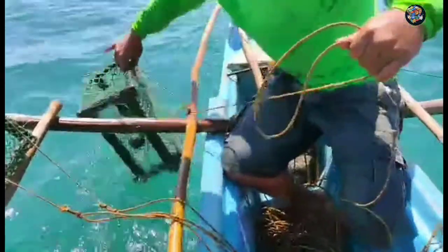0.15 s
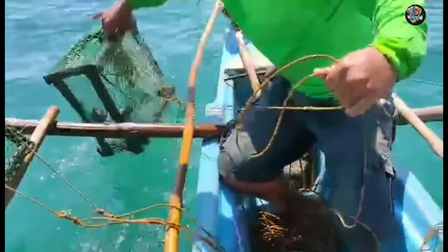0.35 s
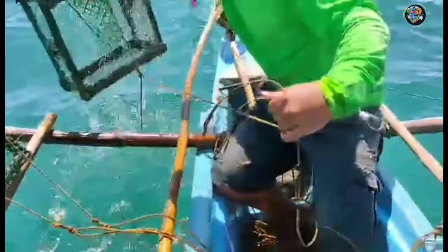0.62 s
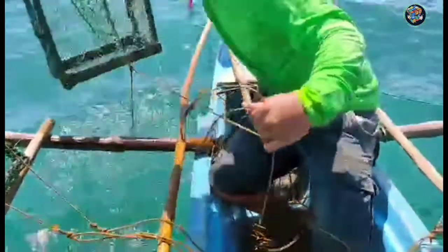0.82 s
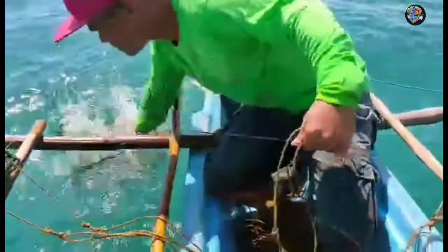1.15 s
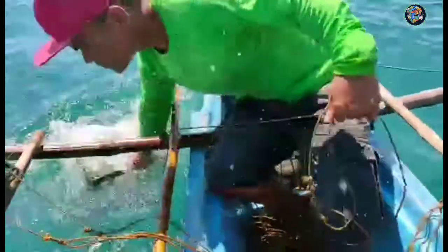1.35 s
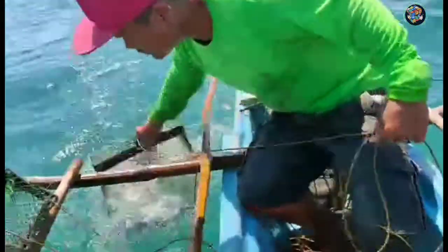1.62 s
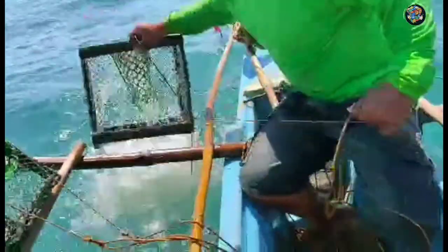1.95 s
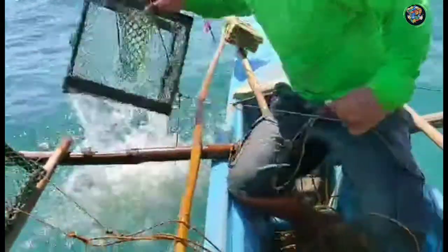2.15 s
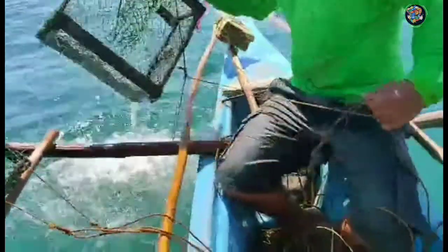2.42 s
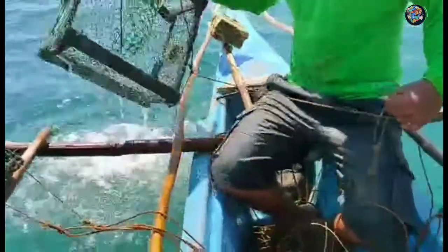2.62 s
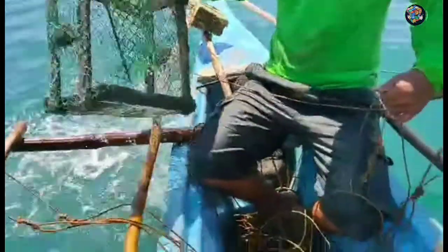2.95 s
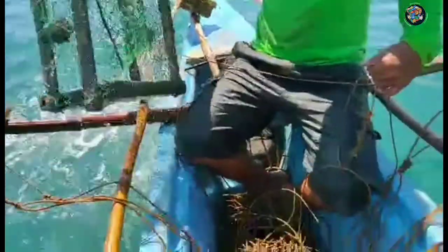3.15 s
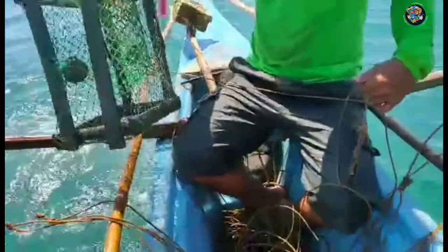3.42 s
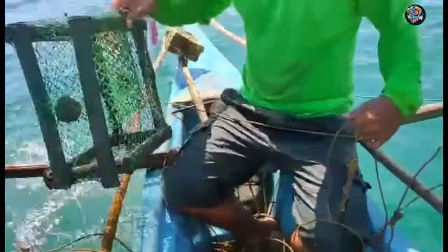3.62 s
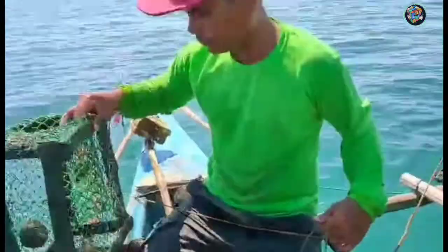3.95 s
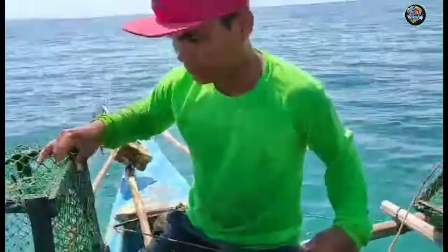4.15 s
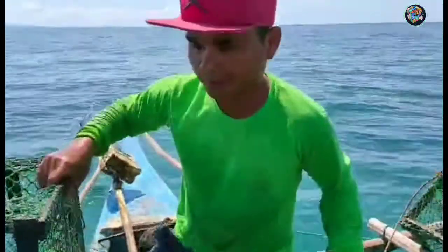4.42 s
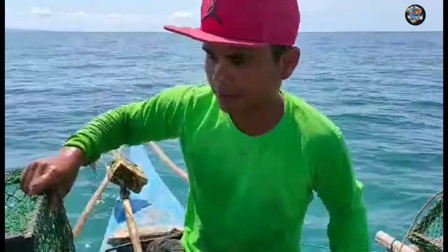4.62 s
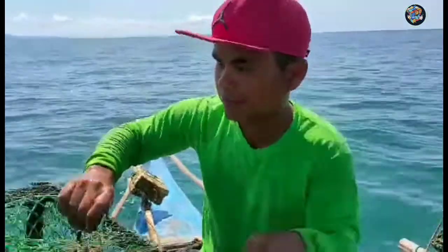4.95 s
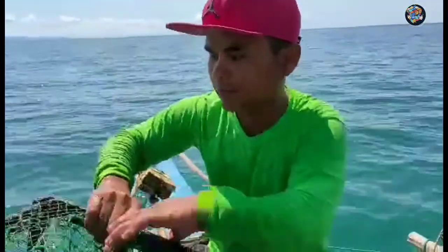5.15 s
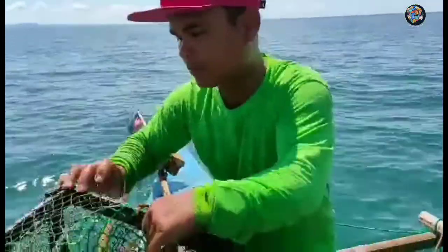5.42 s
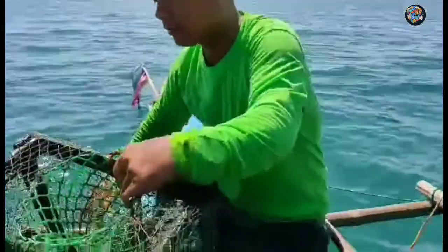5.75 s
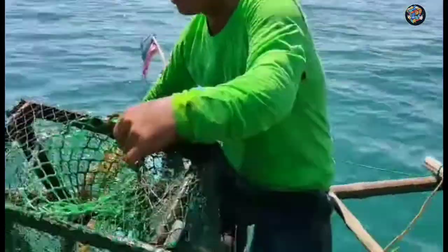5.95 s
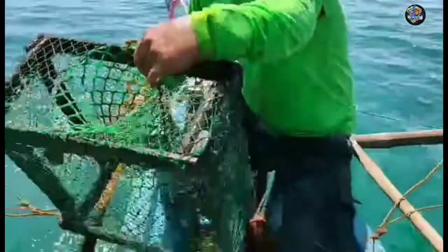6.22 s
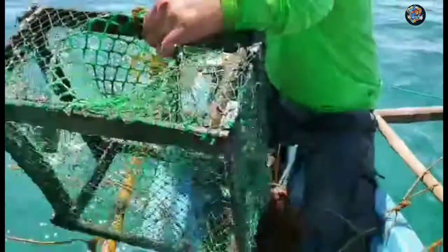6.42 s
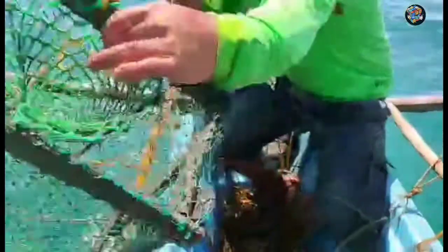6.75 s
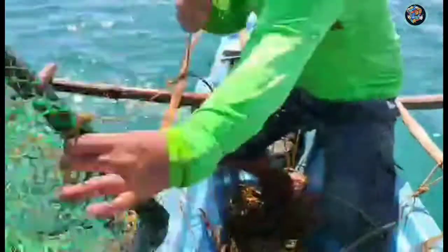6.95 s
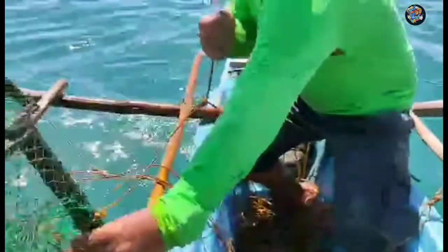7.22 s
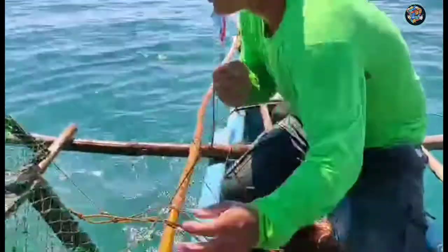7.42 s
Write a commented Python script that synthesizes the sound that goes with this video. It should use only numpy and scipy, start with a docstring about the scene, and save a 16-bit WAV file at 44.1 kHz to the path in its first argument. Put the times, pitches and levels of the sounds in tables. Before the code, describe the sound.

Faint bubbles and drips, then a heavy splash as a mesh trap plunges into the sea, draining water, scattered hollow wooden knocks.

```python
"""Faint bubbles ping and drops tick at first; then a wet net trap is dunked in the sea beside a small
wooden boat, drained, dragged over the edge and set down on the hull. Bubbles are gliding sines, the water
is shaped noise and grains, drops are noise snaps, and knocks ring the modes of the hollow hull.
Two microphone ports a few centimetres apart hear the water from the right, the hull a little to the left."""
import sys
import numpy as np
from scipy import signal
from scipy.fft import rfft, irfft, next_fast_len
from scipy.io import wavfile
from scipy.ndimage import uniform_filter1d, map_coordinates

SR = 44100
rng = np.random.default_rng(int(sys.argv[2]) if len(sys.argv) > 2 else 0)


def wav_record(signal):
    """Record a signal, one row per channel, as 16-bit PCM in the file named by sys.argv[1]."""
    frames = np.transpose(np.atleast_2d(signal))
    bounded = np.clip(frames, -1, 1)
    # unit amplitude maps onto the largest positive 16-bit level
    quanta = np.round(bounded * 32767).astype(np.int16)
    wavfile.write(sys.argv[1], SR, quanta)


N = 335160


def amp(db):
    """Decibels to gain."""
    return 10 ** (np.asarray(db) / 20)


def unit(x):
    """Scaled to rms 1."""
    return x / np.sqrt(np.mean(x ** 2) + 1e-20)


def along(points, hz):
    """(f/Hz, value) points read on a log frequency axis, held flat beyond the ends."""
    f, v = np.transpose(points)
    return np.interp(np.log(hz + 1), np.log(f + 1), v)


def wobble(rate):
    """A smooth random curve, rate knots a second."""
    knots = rng.standard_normal(int(N * rate / SR) + 4)
    return map_coordinates(knots, [np.arange(N) * rate / SR])


def filtered(x, response):
    """x times a complex response of frequency."""
    m = next_fast_len(x.shape[-1] + 8192)
    return irfft(rfft(x, m) * response(np.fft.rfftfreq(m, 1 / SR)), m)[..., :x.shape[-1]]


def coloured_noise(spectrum):
    """Steady noise with a given spectrum, rms 1."""
    return unit(filtered(rng.standard_normal(N), lambda hz: amp(along(spectrum, hz))))


def add(track, s, sound):
    """Mix a sound in at time s."""
    part = track[..., round(s * SR):][..., :sound.shape[-1]]
    part += sound[..., :part.shape[-1]]


def grains(count, hz, spread, cycles, rise, size_db):
    """Damped sines at random moments, rising in pitch if rise is above 0, rms 1 together."""
    u, z = rng.random((count, 2)), rng.standard_normal(count)
    pitch = (hz * np.exp(spread * np.clip(z, -2, 2)))[:, None]
    turns = pitch * np.arange(int(4e6 // count)) / SR
    shape = np.exp(-turns / cycles) * (1 - np.exp(-turns))
    size = amp(-size_db * np.log(np.maximum(u[:, 1:], .01)))
    waves = size * shape * np.sin(2 * np.pi * turns * (1 + rise * turns / cycles))
    index = (u[:, :1] * N).astype(int) + np.arange(turns.shape[1])
    return unit(np.bincount(index.ravel(), waves.ravel(), N)[:N])


def textured(grain, share, spectrum, patchy_db):
    """Grains over noise, evened out, given patches of random gain and then a spectrum."""
    mix = share * grain + (1 - share) * rng.standard_normal(N)
    z = signal.stft(mix, nperseg=512)[2]
    z = z / uniform_filter1d(np.sqrt(np.mean(abs(z) ** 2, axis=1, keepdims=True)), size=5, axis=0)
    patches = uniform_filter1d(rng.standard_normal(z.shape), size=5, axis=0)
    patches = uniform_filter1d(patches, size=6, axis=1)
    flat = signal.istft(z * amp(patchy_db * unit(patches)), nperseg=512)[1][:N]
    return unit(filtered(flat, lambda hz: amp(along(spectrum, hz))))


# the sea low under the hull: (f/Hz, level/dB per Hz)
SEA_SPECTRUM = [(20, -3.5), (110, 7.5), (180, -4.5), (300, -9), (450, -38.5), (880, -120)]


def swell():
    """The sea murmurs low under the hull: deep noise whose level wavers."""
    return amp(-77.5 + 1.8 * wobble(14.0)) * coloured_noise(SEA_SPECTRUM)


# water draining from the trap and lapping at the hull: (t/s, gurgle level/dB, spray level/dB)
DRAINING = [(0, -73.5, -78.5), (.25, -79, -69), (.56, -73, -69.5), (0.731, -69.5, -82), (.77, -46, -50.5),
            (1, -47.5, -51.5), (1.37, -55, -60.5), (1.74, -52.5, -62), (2.3, -60.5, -58),
            (2.68, -61, -60.5), (3.14, -68.5, -65.5), (3.759, -72.5, -71), (3.9, -75.5, -71.5),
            (4.15, -67, -65.5), (4.47, -66, -74.5), (4.8, -86, -82), (5.6, -74.5, -77.5),
            (6.2, -91.5, -77.5), (7.3, -106, -80.5), (7.6, -79, -104)]
# sloshes of water: (t/s at full strength, gurgle level/dB, hold/s)
SLOSHES_OF_WATER = [(0.16, -61.5, 0.018), (0.348, -61.5, 0.05), (0.647, -60, 0.037), (0.891, -34, 0.016),
                    (4.53, -66.5, 0.023), (4.867, -66.5, 0.2), (5.022, -64, 0.32), (5.856, -64.5, 0.025),
                    (6.281, -71.5, 0.34), (6.905, -64.5, 0.23), (7.38, -73.5, 0.079)]
SLOSH_RISE_DB_PER_S, SLOSH_SINK_DB_PER_S = 257, 142.5
SLOSH_SPRAY_DB = -5  # spray over the gurgle


def flow():
    """Gurgle and spray level in dB: the draining plus every slosh, added as power."""
    t = np.arange(N) / SR
    s, *levels_db = np.transpose(DRAINING)
    sloshes = np.zeros(N)
    for at, db, hold in SLOSHES_OF_WATER:
        before, after = np.maximum(at - t, 0), np.maximum(t - at - hold, 0)
        level_db = db - SLOSH_RISE_DB_PER_S * before - SLOSH_SINK_DB_PER_S * after
        sloshes += amp(2 * level_db)  # doubled dB: power
    draining = amp([2 * np.interp(t, s, db) for db in levels_db])
    return 10 * np.log10(draining + sloshes * amp([[0], [2 * SLOSH_SPRAY_DB]]))


def spatter(count, depth_db):
    """Gain that jumps whenever a drop lands and sinks back within some milliseconds."""
    u = rng.random((count, 2))
    drops = np.bincount((u[:, 0] * N).astype(int), -np.log(u[:, 1]), N)
    sinking = signal.lfilter([1], [1, -np.exp(-1 / (0.0066 * SR))], drops)
    return amp(depth_db * np.minimum(sinking, 2))


# body of the water, small bubbles: (f/Hz, level/dB per Hz)
GURGLE_SPECTRUM = [(350, -41.5), (640, -6.5), (786, -6.5), (1520, -5), (3130, -10.5), (3800, -31.5),
                   (4940, -54), (8360, -120)]
# big bubbles in a strong flow: (f/Hz, level/dB per Hz)
CHURN_SPECTRUM = [(150, -49), (250, -15), (450, 1), (650, -1.5), (1000, -66.5)]
# fine spray: (f/Hz, level/dB per Hz)
SPRAY_SPECTRUM = [(2240, -17), (3800, -7), (4960, -5), (6620, -1), (8340, -1), (12600, -15.5), (13300, -38)]


def wash():
    """Water draining and churning: many small bubbles below, fine spray above."""
    flow_db, spray_db = flow()
    slosh, drops = wobble(12.0), spatter(count=260, depth_db=6.0)
    drops = drops ** np.clip((-52.5 - flow_db) / 12, 0, 1)  # a strong flow drowns single drops

    small = grains(count=6000, hz=1510.6, spread=0.5564, cycles=10.9, rise=0.027, size_db=2.5)
    gurgle_gain = amp(flow_db + 3.5 * slosh) * drops
    gurgle = gurgle_gain * textured(small, 0.27, GURGLE_SPECTRUM, patchy_db=3.5)

    # only a strong flow traps big bubbles, so their level climbs faster than the flow
    big = grains(count=4000, hz=455.0, spread=.3, cycles=2.8, rise=0.054, size_db=2.0)
    churn_gain = amp(-64 + 1.43 * (flow_db + 55.0) + 0.24 * wobble(2.0))
    churn = churn_gain * textured(big, 0.3, CHURN_SPECTRUM, patchy_db=3.5)

    fine = grains(count=6000, hz=6310, spread=0.56, cycles=8.2, rise=0.018, size_db=10.5)
    spray_gain = amp(spray_db + 0.37 * slosh) * drops
    spray = spray_gain * textured(fine, 0.22, SPRAY_SPECTRUM, patchy_db=4.0)
    return gurgle + churn + spray


# single drops snapping on wood and mesh: (t/s, level/dB)
DROP_TICKS = [(0.0516, -53.5), (0.4178, -43.5), (0.4532, -42.5), (0.5505, -46.5), (2.3504, -50),
              (2.6903, -35), (3.243, -46), (3.3424, -45.5), (3.6086, -46.5), (3.653, -48), (3.707, -47),
              (3.9354, -46.5), (4.272, -42), (4.5066, -45), (6.2596, -49.5)]


def ticks(count):
    """Each drop is a bright snap of a few milliseconds; lesser ones fall at random, following the spray."""
    t, track = np.arange(SR // 20) / SR, np.zeros(N)
    drain_s, _, spray_db = np.transpose(DRAINING)
    lesser = []
    for s, size in rng.random((count, 2)) * [N / SR, 1]:
        lesser.append((s, np.interp(s, drain_s, spray_db) + 11 + 8 * size))
    for s, db in [*DROP_TICKS, *lesser]:
        add(track, s, amp(db - 6 - 60 * t / 0.016))
    bright, body = coloured_noise(SPRAY_SPECTRUM), coloured_noise(GURGLE_SPECTRUM)
    return track * (bright + amp(-6.5) * body)


PLINK_HZ, PLINK_SPREAD, PLINK_CYCLES, PLINK_RISE = 1506, .45, 9, 0.24  # middle values
PLINK_DB, PLINK_SCATTER_DB = 5.5, 7  # over the draining gurgle
PLINK_TOP_DB = -58.5  # a gurgle stronger than this drowns them


def plinks(count):
    """Rows of lesser bubbles at random moments, their level following the draining water up to a cap."""
    s = rng.random(count) * N / SR + 0.002017
    z = np.clip(rng.standard_normal((count, 4)), -2, 2)
    hz = PLINK_HZ * np.exp(PLINK_SPREAD * z[:, 0])
    drain_s, gurgle_db, _ = np.transpose(DRAINING)
    around_db = np.minimum(np.interp(s, drain_s, gurgle_db), PLINK_TOP_DB)
    db = around_db + PLINK_DB + PLINK_SCATTER_DB * z[:, 1]
    length = PLINK_CYCLES * np.exp(0.87 * z[:, 2]) / hz
    return np.transpose([s, db, hz, length, PLINK_RISE * (1 + 0.51 * z[:, 3])])


# the clearest single bubbles, and the low boom of the plunge at .887 s:
# (t/s, level/dB, first f/Hz, length/s, share by which the pitch climbs over that length)
BUBBLES_AND_BOOM = [(.125, -54.5, 1447, 0.095, -0.11), (.209, -45.5, 846, 0.026, 0.12),
                    (.254, -49.5, 1143, 0.042, 0.19), (.327, -60.5, 471, 0.09, 0.13),
                    (.347, -48.5, 870, 0.034, -0.016), (.455, -48.5, 510, 0.019, -0.016),
                    (.509, -43, 453, 0.057, -0.048), (.553, -44, 452, 0.03, 0.044),
                    (.591, -43.5, 471, 0.021, 0.072), (.636, -46, 565, 0.031, 0.081),
                    (.668, -49.5, 698, 0.019, 1), (.721, -47, 780, 0.02, 0.42),
                    (.767, -26, 496, 0.0078, -0.1), (.887, -39, 90.6, 0.089, .16),
                    (.892, -30, 500, 0.024, 0.0053), (.98, -22, 490, 0.0049, 0.015),
                    (1.699, -34, 445, 0.0044, -0.064), (1.716, -42, 667, 0.037, -0.41),
                    (1.859, -43, 494, 0.015, -0.002), (2.046, -38, 266, 0.021, 0.012),
                    (2.558, -48.5, 354, 0.031, -0.0066), (2.903, -42, 1180, 0.0063, -0.0049),
                    (3.077, -49.5, 562, 0.036, -0.033), (3.094, -38.5, 2765, 0.017, -0.012),
                    (3.133, -37, 516, 0.026, 0.11), (3.298, -50.5, 2440, 0.028, 0.21),
                    (3.448, -53.5, 1156, 0.016, 0.15), (3.503, -56.5, 1314, 0.021, 0.18),
                    (3.528, -57.5, 466, 0.024, 0.43), (3.697, -43, 1625, 0.0076, 0.058),
                    (3.77, -50.5, 1630, 0.013, 0.24), (4.119, -44, 1060, 0.017, 0.12),
                    (4.279, -53.5, 722, 0.046, 0.12), (4.401, -46, 1364, 0.016, 0.0052),
                    (4.642, -50.5, 1680, 0.018, 0.02), (5.663, -47.5, 692, 0.037, 0.065),
                    (7.161, -49.5, 1404, 0.029, 0.074), (7.224, -53, 844, 0.01, -0.18)]


def bubbles():
    """Bubbles, and the plunge's low boom, are fading sines that glide in pitch; moving water makes them tremble."""
    out, waver, tremble = np.zeros(N), wobble(160.0), wobble(120.0)
    for s, db, first_hz, length, rise in [*BUBBLES_AND_BOOM, *plinks(count=600)]:
        t = np.arange(int(3 * length * SR)) / SR
        here = np.minimum(round(s * SR) + np.arange(len(t)), N - 1)
        glide = rise * np.minimum(t / length, 1.3)  # a bubble's pitch glides as it nears the surface
        pitch = first_hz * (1 + glide + 0.038 * waver[here])
        fade = amp(-11 * (t / length) ** 1.35)
        fade *= 1 - np.exp(-t * first_hz / 1.11)  # builds over about a cycle
        ring = np.sin(2 * np.pi * np.cumsum(pitch) / SR)
        add(out, s - .002, amp(db + 2.0 * tremble[here]) * fade * ring)
    return out


# thrown water landing: (t/s, spray level/dB, body level/dB over the spray)
LANDINGS = [(0.3253, -45, -2.5), (0.588, -53.5, 2), (0.616, -48, -4.5), (0.7484, -14.5, -1),
            (0.8644, -33.5, -2.5), (1.489, -50, 14), (2.22, -61.5, 15), (2.264, -45.5, 0.5),
            (2.617, -44, -19.5), (3.095, -50, -13), (3.444, -48, -33), (3.599, -54, -15), (3.898, -54.5, 3),
            (4.399, -54, 4.5), (4.5122, -45, -14), (5.6685, -60.5, 13), (6.0714, -67, 11.5),
            (6.789, -35, 9.5), (7.343, -75, 3), (7.398, -68.5, 8.5)]


def splats():
    """Thrown water lands as a burst of noise that builds over some milliseconds and dies."""
    t = np.arange(SR // 2) / SR
    tracks = np.zeros((2, N))
    for s, db, body_db in LANDINGS:
        life = 0.084 * amp(0.014 * (db + 50.5))  # more water takes longer to land
        build_s = 0.0018 * amp(.5 * (db + 56.5))
        burst = amp(db - 60 * t / life) * (1 - np.exp(-t / build_s))
        add(tracks, s - .003, burst * amp([[body_db], [0]]))
    body, spray = coloured_noise(GURGLE_SPECTRUM), coloured_noise(SPRAY_SPECTRUM)
    return tracks[0] * body + tracks[1] * spray


# the wet mesh dragged over the edge of the hull: (f/Hz, level/dB per Hz)
RASP_SPECTRUM = [(88, -45), (150, -16.5), (776, -6.5), (2660, -13), (4010, -21), (8000, -21), (13000, -36)]
DRAG_S, DRAG_END_S = 6.695, 6.8  # full strength from, to
DRAG_DB, DRAG_SLOPE_DB_PER_S = -44.5, 459  # level; build-up and fall


def drag():
    """Mesh knots slip over the wood in a dense, even rasp until the frame lands."""
    t = np.arange(N) / SR
    knots = grains(count=20000, hz=3050, spread=.6, cycles=1.23, rise=0, size_db=-1.0)
    outside_s = np.maximum(DRAG_S - t, 0) + np.maximum(t - DRAG_END_S, 0)
    stroke = amp(DRAG_DB - DRAG_SLOPE_DB_PER_S * outside_s)
    return stroke * textured(knots, 0.19, RASP_SPECTRUM, patchy_db=1.0)


# thuds through the hull, from the trap frame or its plunge alongside:
# (t/s, thud level/dB, strongest tone f/Hz, crack level/dB over the thud)
HULL_KNOCKS = [(.759, -41.5, 440, 8.5), (.884, -29, 380, -1.5), (2.596, -25, 204, -3),
               (2.615, -27.5, 180, -7), (2.692, -37.5, 202, -28), (2.761, -33.5, 169.4, -24),
               (2.995, -48, 330, -9), (3.014, -42.5, 205, -16.5), (3.889, -53.5, 370, -14),
               (3.907, -45.5, 180, 3), (3.943, -48, 200, 8), (4.262, -49.5, 181, -17),
               (4.291, -48.5, 205, -10), (5.023, -29, 298, -1), (5.052, -32, 243, -8.5),
               (5.11, -27.5, 265, -2.5), (5.152, -44, 198, 6.5), (5.211, -27.5, 249, -1.5),
               (5.293, -34.5, 233, -1.5), (5.334, -44.5, 170, -8.5), (5.385, -50, 215, -11),
               (5.834, -39.5, 286, 9), (6.017, -61.5, 286, -15.5), (6.693, -44.5, 330, 10.5),
               (6.795, -15, 360, 2), (6.833, -32, 250, 10.5), (6.846, -24.5, 123, -19),
               (6.917, -35.5, 197, -24), (6.955, -35, 138, -24), (7.009, -46, 424, 9),
               (7.13, -49, 135.5, -12), (7.17, -57, 90.8, -22)]
# ringing modes of the hull: (f/Hz, level/dB, t60/s)
HULL_MODES = [(98, -9, 1), (133.6, -6, 0.62), (178, -4.5, 0.56), (205, -8, 0.75), (247.4, 0.5, 0.24),
              (293.6, -3, 0.23), (354.6, 2, 0.22), (473, -24.5, 0.056), (678.5, -8.5, 0.12),
              (836, -5, 0.058), (1063, -8, 0.059), (1213, -4, 0.026)]


def knocks():
    """Every blow rings the low hull modes nearest its strongest tone most, with a rumble and a woody crack."""
    out, t, flutter = np.zeros(N), np.arange(SR // 2) / SR, wobble(22.0)
    for s, db, tone_hz, crack_db in HULL_KNOCKS:
        thud, crack = np.zeros(len(t)), np.zeros(len(t))
        for hz, level, t60 in HULL_MODES:
            # each mode is a close pair, so the ring beats instead of singing
            pair = sum(np.sin(2 * np.pi * hz * (1 + 0.018 * rng.normal()) * t) for _ in range(2))
            ring = amp(level + rng.normal(0, 2.55) - 60 * t / t60) * pair
            if hz < 500:
                nearness = amp(-13 * abs(np.log2(hz / tone_hz)))
                thud += ring * nearness * (1 - np.exp(-t * hz / 0.86))  # deep modes build slowly
            else:
                crack += ring
        wood = lambda f: 1j * f * 900 / (850 ** 2 - f * f + 1j * f * 900)
        crack += 0.89 * amp(-60 * t / 0.22) * filtered(rng.standard_normal(len(t)), wood)

        # the many weaker hull modes merge into a rough rumble
        resonance = lambda f: 1j * f * tone_hz / (tone_hz ** 2 - f * f + 1j * f * tone_hz)
        boom = lambda f: resonance(f) / (1 + 1j * f / 450) ** 2
        rumble = unit(filtered(rng.standard_normal(len(t)), boom))
        thud += 0.64 * amp(-60 * t / 0.45) * (1 - np.exp(-t / 0.0084)) * rumble
        thud *= 1 + 2.1 * np.exp(-t / 0.025)  # the struck plank gives up its energy first
        thud *= amp(-20 * (t / 0.43) ** 4)  # the ring holds at first, then drops away ever faster

        crack *= amp(crack_db) / abs(crack).max()
        blow = thud / abs(thud).max() + (1 - np.exp(-t / 0.0018)) * crack
        blow = filtered(blow, lambda f: (1j * f / (1j * f + 60.0)) ** 2)  # a small hull radiates little deep bass
        add(out, s - .002, amp(db) * blow)
    return out * amp(1.6 * flutter)  # a quick random flutter makes the ring uneven


# left-right likeness at the two ports: (f/Hz, likeness 0 to 1)
LIKENESS = [(30, 0.84), (120, 0.93), (600, 0.91), (2000, 0.48), (8000, 0.26)]


def ports(x, lag_ms, alike_scale):
    """Two ports: the left hears later by the lag (earlier if negative), and scattered sound differs between them."""
    z = signal.stft(x, nperseg=128)[2]
    scrambled = z * np.exp(2j * np.pi * rng.random(z.shape))
    other = signal.istft(scrambled, nperseg=128)[1][:len(x)]
    other = other * np.std(x) / (np.std(other) + 1e-20)
    turn = lambda hz: np.arccos(np.clip(alike_scale * along(LIKENESS, hz), 0, 1)) / 2
    late = lambda hz: np.exp(-1j * np.pi * hz * lag_ms / 1000)  # half the lag on each side
    mid, side = filtered(np.array([x, other]), lambda hz: np.array([np.cos(turn(hz)), np.sin(turn(hz))]))
    return filtered(np.array([mid + side, mid - side]), lambda hz: np.array([late(hz), 1 / late(hz)]))


def scene():
    """Water from the right, the hull a little to the left."""
    water = swell() + wash() + ticks(count=160) + splats()
    water = ports(water, lag_ms=0.14, alike_scale=0.99)
    ringing = ports(bubbles(), lag_ms=0.14, alike_scale=1.1)
    hull = ports(drag() + knocks(), lag_ms=-0.13, alike_scale=1.095) * amp([[.8], [-.8]])
    return water + ringing + hull


# port colour, right over left: (f/Hz, level/dB)
PORT_COLOUR = [(500, 0.5), (1500, 1.5), (3000, 1), (5500, -4), (9000, 8), (12500, 3.5)]
TOP_HZ = 13700  # band limit


def record(dry):
    """The ports differ in colour, half the lean on each; nothing is kept above the band limit."""
    lean = lambda hz: amp(along(PORT_COLOUR, hz) * np.array([[-.5], [.5]]))
    return filtered(dry, lambda hz: lean(hz) * (hz < TOP_HZ))


dry = scene()
out = record(dry)
wav_record(out)
```